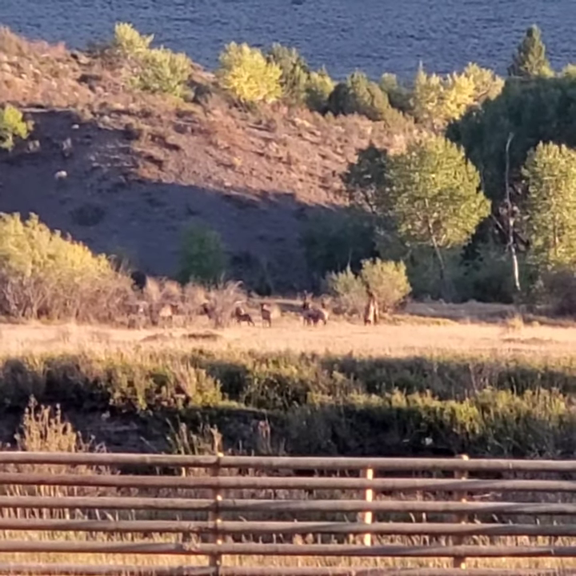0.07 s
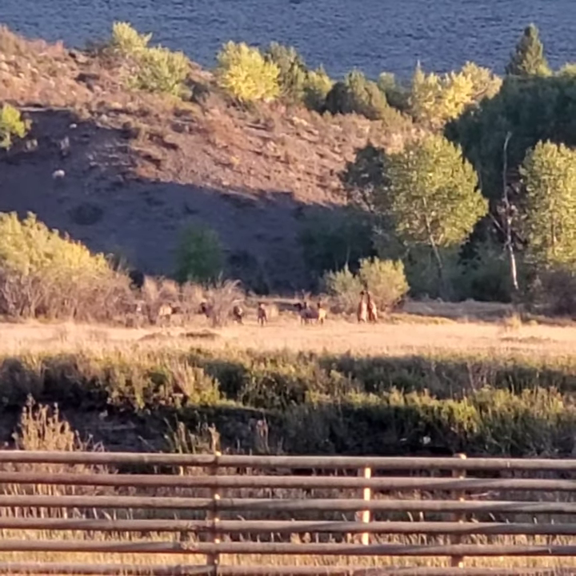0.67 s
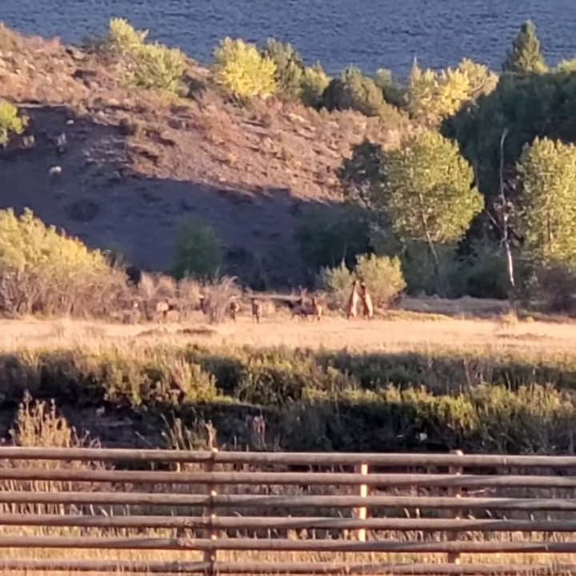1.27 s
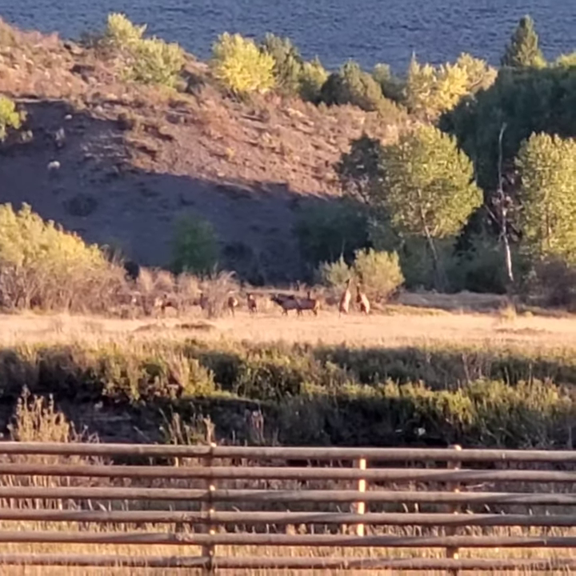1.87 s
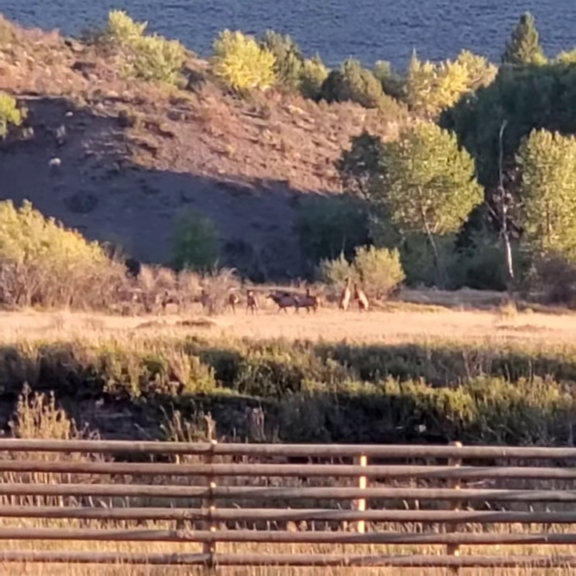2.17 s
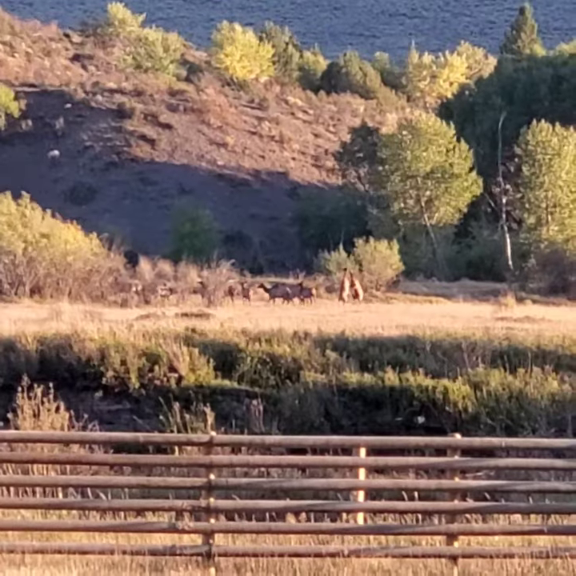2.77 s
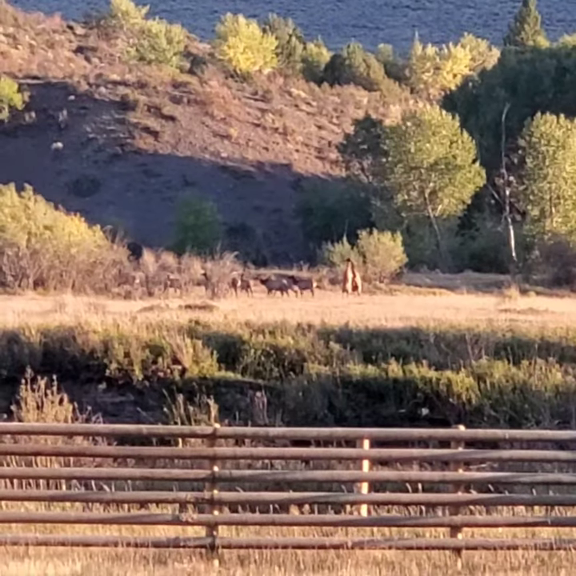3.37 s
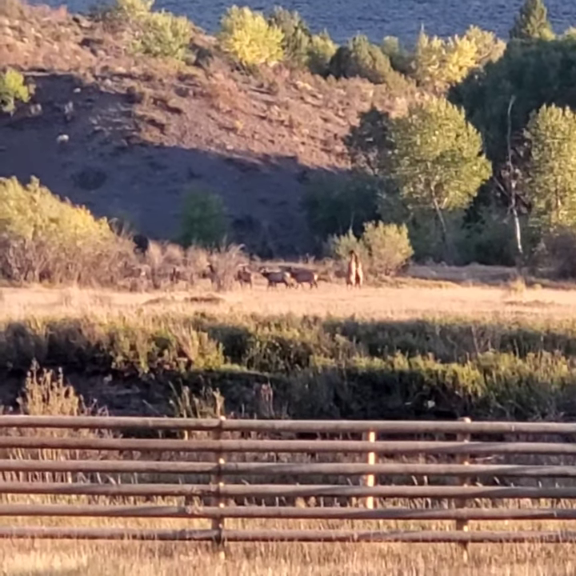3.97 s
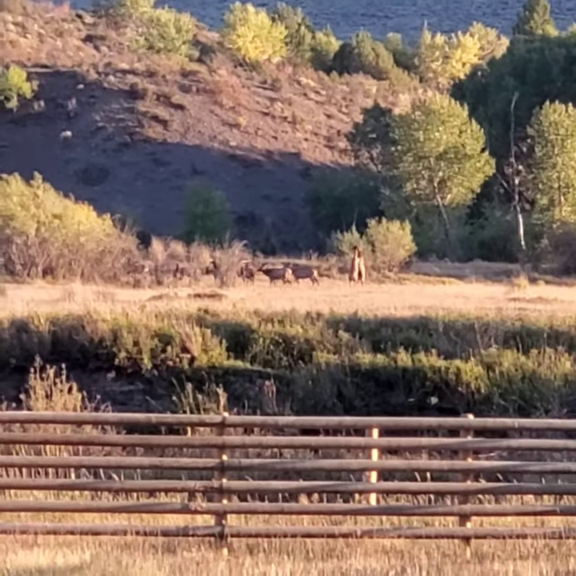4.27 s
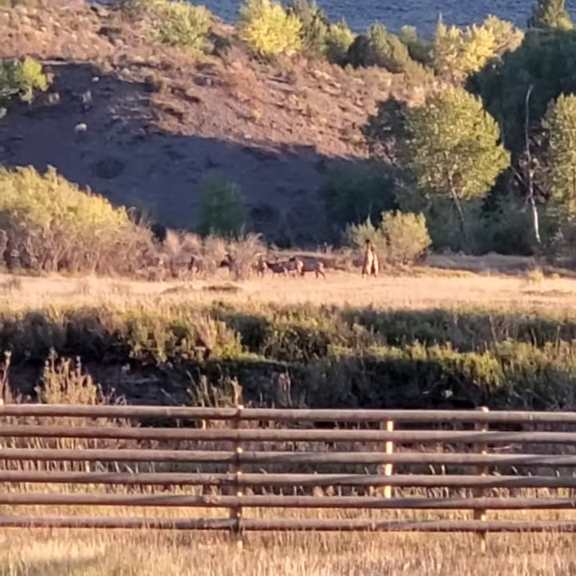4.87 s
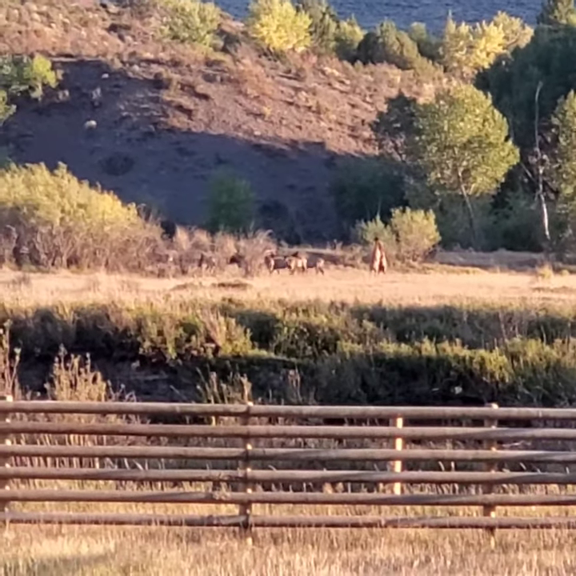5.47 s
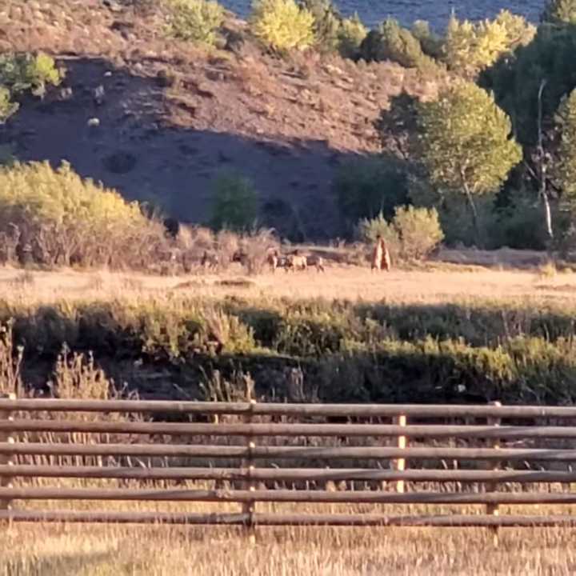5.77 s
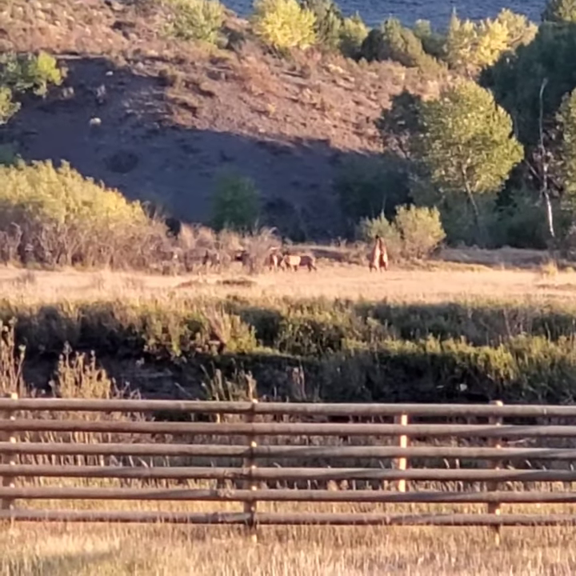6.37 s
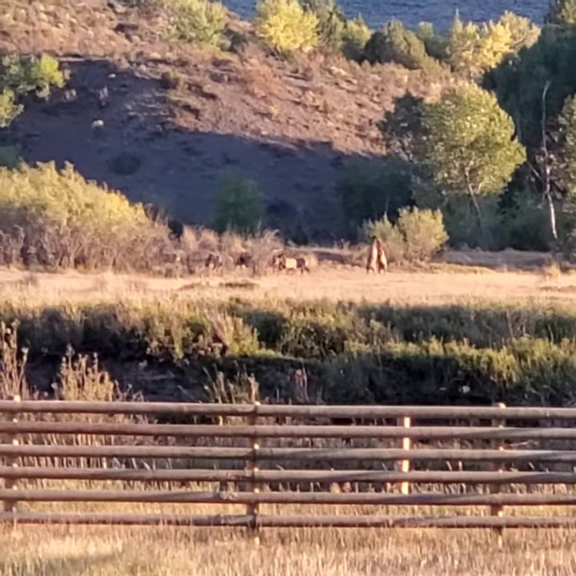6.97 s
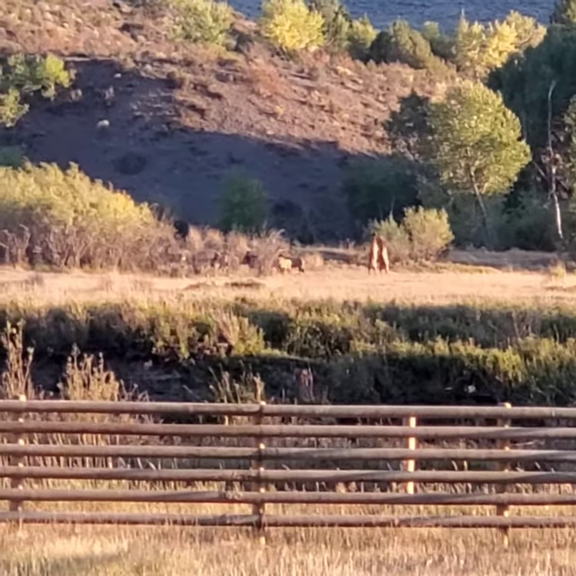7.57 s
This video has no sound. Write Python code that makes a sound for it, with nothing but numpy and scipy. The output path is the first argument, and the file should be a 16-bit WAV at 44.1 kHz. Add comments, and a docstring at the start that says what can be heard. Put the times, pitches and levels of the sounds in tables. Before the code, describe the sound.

Light wind rumbles and thumps on the microphone over a distant idling engine and a steady outdoor hiss.

```python
"""Breezy meadow with a distant engine

Hand-held two-port microphone in the open. Some way off to the right a big engine idles: exhaust drone,
with a chuff, soft clatter and faint squeaks on every cycle. Far traffic swells and fades over a steady
hiss; puffs of breeze stir the grass. Up close, wind rumbles and thumps and fingers tick on the case."""
import sys
import numpy as np
from scipy import signal
from scipy.fft import rfft, irfft, next_fast_len
from scipy.io import wavfile
from scipy.ndimage import uniform_filter1d

SR = 44100
rng = np.random.default_rng(int(sys.argv[2]) if len(sys.argv) > 2 else 0)


def wav_out(sig):
    """Save sig, one row per channel (or a flat mono array), as 16-bit PCM at SR to the path in sys.argv[1]."""
    wavfile.write(sys.argv[1], SR, np.round(np.clip(np.atleast_2d(sig).T, -1, 1) * 32767).astype(np.int16))


N = 336042
TIME = np.arange(N) / SR
SIZE = next_fast_len(N, True)
FREQ = np.maximum(np.fft.rfftfreq(SIZE, 1 / SR), 1)
CYCLE_HZ = 5.0  # engine cycles a second

# Exhaust drone. Each row: multiple of the engine cycle, level in dB.
EXHAUST_HARMONICS = [(8, -43), (9, -50), (10, -43), (11, -44), (12, -43), (13, -35), (14, -47), (15, -50),
                     (16, -46), (18, -48), (19, -40), (21, -48), (22, -49), (24, -53), (26, -60), (27, -60),
                     (29, -60)]
# Chuff of pipe and body. Each row: seconds into the cycle, pitch in Hz, width in Hz, level in dB.
ENGINE_KNOCKS = [(.115, 207, 29, -48.7), (.114, 260, 105, -60), (.122, 178, 80, -60.5),
                 (.139, 235, 80, -61.5), (.137, 359, 75, -58.5), (.004, 412, 46, -60),
                 (.050, 430, 90, -65.5), (.100, 430, 110, -64), (.121, 580, 220, -63),
                 (.140, 640, 260, -62.5), (.159, 800, 630, -66.5)]
# Valves. Each row: seconds into the cycle, half length in seconds, centre and width in Hz, level in dB.
VALVE_RATTLES = [(.164, .015, 1230, 300, -61.5), (.186, .013, 1420, 360, -63),
                 (.186, .022, 1850, 140, -65.5), (.178, .012, 2300, 900, -70.5),
                 (.029, .011, 2860, 1200, -71.5)]
# Ringing fan and covers. Each row: centre in Hz, width in Hz, level in dB.
COVER_RESONANCES = [(408, 16, -63), (741.3, 39, -61), (1137, 12, -72.5), (1198, 45, -65.5),
                    (1296, 19, -75.5), (1495, 25, -71.5), (1850, 22, -71.5), (2745, 42, -73)]
# Engine squeaks. Each row: seconds into the cycle, pitch in Hz, base level in dB.
ENGINE_SQUEAKS = [(.018, 6950, -88), (.040, 7830, -89), (.065, 7720, -85.5), (.122, 6920, -86),
                  (.148, 7600, -89), (.146, 8700, -91)]
# Colour of the hillside echo. Each row: frequency in Hz, gain in dB.
ECHO_COLOUR = [(150, -5), (500, 0.5), (1200, 5.5), (3000, 0)]
# Balance at the microphone. Each row: frequency in Hz, lead of the right port over the left in dB.
RIGHT_LEAD = [(200, 0.5), (400, 1.5), (750, 3.5), (1300, 5), (2500, 0.5), (7000, 3.5), (12000, 0.5)]
# Spectra of valley air, far road, grass and wind rumble. Each row: frequency in Hz, relative level in dB.
AIR_SPECTRUM = [(120, 3), (300, -3), (400, 0), (600, -2.5), (760, -4.5), (950, -11), (1250, -9.5),
                (2000, -17.5), (2700, -16.5), (3350, -15), (3900, -30.5), (5200, -37), (6300, -40.5),
                (7700, -42), (9800, -48), (11700, -42.5), (15000, -42)]
ROAD_SPECTRUM = [(250, -16), (460, -2.5), (680, -0.5), (900, -10), (1130, -8), (1550, -14.5), (2200, -24),
                 (4000, -38.5), (8000, -53)]
GRASS_SPECTRUM = [(800, -17), (1250, 3), (1550, 8), (2000, -10.5), (3200, -11.5), (4200, -23), (6500, -34),
                  (12000, -39.5)]
RUMBLE_SPECTRUM = [(12, -31), (24, -12), (40, -1.5), (62, -1.5), (85, -0.5), (115, -13), (160, -20),
                   (250, -35), (500, -54), (1500, -90)]
# Tyre whine from the far road. Each row: time in seconds, relative level in dB.
WHINE_LEVELS = [(0.0, -58), (1.2, -70.5), (1.7, -58.5), (2.8, -60), (3.4, -55.5), (3.84, -62),
                (5.04, -69.5), (5.42, -70.5), (5.63, -51), (5.88, -60.5), (6.25, -53), (6.55, -56),
                (6.85, -67), (7.15, -66), (7.36, -57.5), (7.6, -57.5)]
# Faster cars farther off. Each row: peak time and half length in seconds, level in dB, pitch in Hz.
FAST_CAR_PASSES = [(4.97, 0.26, -56.5, 890), (6.65, 0.14, -56, 876), (7.06, 0.16, -57, 860)]
# Puffs in the dry grass. Each row: peak time and half length in seconds, hiss and rustle levels in dB.
GRASS_PUFFS = [(.42, 0.16, -59.5, -77.5), (2.38, 0.045, -57, -83), (2.517, 0.13, -55, -76.5),
               (3.17, 0.1, -63, -80), (3.772, .06, -53, -90), (5.95, .22, -62, -90)]
# Breeze on the microphone. Each row: time in seconds, strength in dB, lean to the left port in dB.
BREEZE_COURSE = [(0.0, -31.5, 4), (.15, -33, -3.5), (.35, -26.5, 6), (.58, -31, 7), (.78, -30.5, -4.5),
                 (.98, -30.5, -1.5), (1.8, -31, 6), (2.7, -30, 1), (2.88, -29.5, 1), (3.05, -31, -14.5),
                 (3.45, -34.5, 1.5), (3.92, -35, 5.5), (4.05, -29.5, 14.5), (4.5, -29.5, 8.5),
                 (4.8, -30, -8), (5.15, -35, 7.5), (5.6, -30, 15.5), (5.94, -31.5, -5), (6.08, -31.5, 2),
                 (6.3, -31.5, 5), (6.48, -32, 9), (6.76, -30, 11), (7.15, -36, 0.5), (7.33, -30.5, 13.5),
                 (7.6, -36, 16.5)]
# Strong eddies. Each row: time in seconds, port (0 left, 1 right), strength in dB, frequency in Hz.
PORT_EDDIES = [(1.287, 0, -12.5, 62.2), (2.917, 1, -7.5, 70), (4.076, 0, -14.5, 98), (4.150, 0, -19, 138),
               (4.269, 0, -14.5, 62), (4.375, 0, -13.5, 86.5), (4.419, 0, -17.5, 95), (4.540, 0, -20, 84.6),
               (4.627, 1, -19.5, 105), (4.806, 1, -16.5, 75.5), (4.878, 1, -10, 72.5),
               (5.303, 0, -15.5, 94.6), (5.658, 0, -6, 87.6), (5.83, 0, -15.5, 104), (6.295, 0, -20, 107),
               (6.733, 0, -15, 70.7), (7.317, 0, -13, 77.7), (7.407, 0, -13.5, 65.7),
               (7.595, 0, -6.5, 74.2)]
# Brief bright rustles: a high one with a puff in the grass, then fingers rubbing the case.
# Each row: peak time and half length in seconds, level in dB, centre in Hz.
BRIGHT_RUSTLES = [(2.5, .1, -78, 12500), (4.56, .05, -71, 11500), (6.162, .04, -74, 6000),
                  (6.45, .05, -77, 13000)]
# Case ticks. Each row: start in seconds, mid-port peak in dB, centre and width in Hz, decay in seconds.
FINGER_TICKS = [(4.4985, -60, 10800, 3500, .001), (4.5145, -58.5, 5300, 2000, .002),
                (4.5203, -48.5, 11100, 2600, .0013), (4.555, -45, 9800, 6960, .0009),
                (4.555, -48.5, 5400, 1800, .001), (4.582, -52, 13500, 5500, .001),
                (4.648, -47, 3100, 700, .005), (4.651, -60, 4860, 500, .004),
                (6.1492, -52.5, 4950, 1900, .0008), (6.1628, -44, 6850, 2200, .001),
                (6.1626, -52.5, 4600, 1300, .001), (6.163, -51.5, 11900, 1800, .0014),
                (6.469, -59, 13500, 4000, .001)]


def undb(db):
    """Decibels to gain."""
    return 10 ** (np.asarray(db) / 20)


def unit(x):
    """Scale to rms 1."""
    return x / np.sqrt(np.mean(x ** 2))


def curves(table):
    """Each column of a table of timed rows, sample by sample."""
    times, *columns = np.transpose(table)
    return [np.interp(TIME, times, column) for column in columns]


def colour(points):
    """Gain at every frequency from (Hz, dB) points."""
    hz, db = np.transpose(points)
    return undb(np.interp(np.log(FREQ), np.log(hz), db))


def band(hz, width):
    """Response of a resonance applied twice."""
    return 1 / (1 + 1j * (FREQ / hz - hz / FREQ) * hz / width) ** 2


def shaped(x, response):
    """Filter x by a frequency response."""
    return irfft(rfft(x, SIZE) * response, SIZE)[..., :N]


def noise(response):
    """Fresh noise of rms 1 with the given colour."""
    return unit(shaped(rng.standard_normal(SIZE), response))


def walk(rate):
    """Random levels held 1 / rate seconds and smoothed twice; spread near 1."""
    hold = int(SR / rate)
    steps = np.repeat(rng.standard_normal(N // hold + 1), hold)
    return 1.12 * uniform_filter1d(uniform_filter1d(steps, hold), hold)[:N]


def swell(s, half_s):
    """A smooth rise and fall, 1 at time s."""
    return np.exp(-((TIME - s) / half_s) ** 2)


def cycle_gate(s, half_s):
    """A smooth rise and fall at the same place in every engine cycle."""
    away_s = (((TIME - s) * CYCLE_HZ + .5) % 1 - .5) / CYCLE_HZ
    return np.exp(-(away_s / half_s) ** 2)


def from_right(x, lag_s=.000275):
    """A source off to the right reaches the left port later and a little weaker."""
    shade = np.sqrt(colour(RIGHT_LEAD))
    delay = np.exp(-2j * np.pi * FREQ * lag_s)
    return np.array([shaped(x, delay / shade), shaped(x, shade)])


def all_around(response, direct, port_travel_s=.00031):
    """Noise from every side, alike at both ports only in the bass, plus a direct share from the right."""
    alike = np.sinc(2 * FREQ * port_travel_s)
    shade = np.sqrt(colour(RIGHT_LEAD))
    mid, side = (shaped(noise(response), np.sqrt((1 + sign * alike) / 2)) for sign in (1, -1))
    diffuse = np.array([shaped(mid + side, 1 / shade), shaped(mid - side, shade)])
    return np.sqrt(1 - direct) * diffuse + np.sqrt(direct) * from_right(noise(response))


def exhaust_drone(waver_db=1.5):
    """Low harmonics of the engine cycle, each wavering on its way through the moving air."""
    phase = 2 * np.pi * CYCLE_HZ * TIME
    out = 0
    for multiple, db in EXHAUST_HARMONICS:
        amplitude = np.sqrt(2) * undb(db + waver_db * walk(1.4))
        out += amplitude * np.sin(multiple * phase + rng.uniform(0, 2 * np.pi))
    return out


def engine_knocks(scatter_db=.56, jitter_s=.00067, rush_share=.5):
    """Once a cycle a blow rings each resonance of pipe and body; distance softens the attack."""
    starts = np.arange(0, N / SR, 1 / CYCLE_HZ)
    age = TIME[:SR // 4]
    out = 0
    for s, hz, width, db in ENGINE_KNOCKS:
        late, size = rng.standard_normal((len(starts), 2)).T
        blows = np.zeros(N + SR)
        blows[np.abs((starts + s + jitter_s * late) * SR).astype(int)] = undb(scatter_db * size)
        envelope = age ** 2 * np.exp(-np.pi * width * age)
        ring = signal.fftconvolve(blows, envelope * np.sin(2 * np.pi * hz * age))[:N]
        # the rush of gas makes every blow a little different
        rush = signal.fftconvolve(blows, envelope)[:N] * noise(band(hz, width) ** 2)
        out += undb(db) * unit(unit(ring) + rush_share * unit(rush))
    return out


def valve_clatter(scatter_db=1.9):
    """The valves give short, dull rattles at the same places in every cycle."""
    out = 0
    for s, half_s, hz, width, db in VALVE_RATTLES:
        gate = cycle_gate(s, half_s) * undb(scatter_db * walk(7.6))
        out += undb(db) * unit(gate * noise(band(hz, width) ** 2))
    return out


def cover_ringing():
    """The engine keeps its fan and covers ringing; they waver by a decibel in the moving air."""
    return sum(undb(db + walk(2.7)) * noise(band(hz, width)) for hz, width, db in COVER_RESONANCES)


def engine_squeaks(scatter_db=3.0, waver=.005, carry_db=3.5):
    """Tiny, unsteady high notes tick along with the cycle, each time at another strength."""
    out = 0
    for s, hz, db in ENGINE_SQUEAKS:
        pitch = hz * (1 + waver * walk(200))
        note = np.sqrt(2) * np.sin(2 * np.pi * np.cumsum(pitch) / SR)
        out += undb(db + scatter_db * walk(6)) * cycle_gate(s, half_s=.009) * note
    return out * undb(carry_db * swell(3.9, half_s=.6))  # for a moment they carry best


def hillside_echo(x, gain_db=-7, t60_s=.38):
    """The hillside throws the sound back as a blurred, fading tail, different at each port."""
    tails = rng.standard_normal((2, SR)) * undb(-60 * TIME[:SR] / t60_s)
    echo = np.array([signal.fftconvolve(x, tail / np.linalg.norm(tail))[:N] for tail in tails])
    return undb(gain_db) * shaped(echo, colour(ECHO_COLOUR))


def valley_air(level_db=-44, flicker_db=1.1):
    """Steady hiss all round the microphone; its middle range flickers a little in the breeze."""
    air = all_around(colour(AIR_SPECTRUM), direct=.13)
    middle = shaped(air, np.abs(band(800, 2600)))
    return undb(level_db) * (air + middle * (undb(flicker_db * walk(14)) - 1))


def tyre_whine(hz, width_hz=19):
    """Far tyres sing: a narrow band of noise around a moving pitch."""
    flutter = noise(1 / (1 + (FREQ / width_hz) ** 4))
    return unit(flutter * np.sin(2 * np.pi * np.cumsum(hz) / SR))


def far_traffic(road_db=-60, pass_db=-47, whine_hz=763, whine_lift_db=1.4, fade_db=2.2):
    """The far road's roar swells as one vehicle passes; tyre whines drift in pitch above it."""
    passing = undb(pass_db) * swell(3.14, half_s=.7)
    roar = all_around(colour(ROAD_SPECTRUM), direct=.24) * np.hypot(undb(road_db), passing)
    drift = 1 + .008 * walk(1.5)
    whine = undb(curves(WHINE_LEVELS)[0] + whine_lift_db) * tyre_whine(whine_hz * drift)
    for s, half_s, db, hz in FAST_CAR_PASSES:
        whine += undb(db) * swell(s, half_s) * tyre_whine(hz * drift)
    return roar + from_right(whine * undb(fade_db * walk(9)))  # tyres fade in and out in the moving air


def grass(lull_db=-74, grain_db=4.0, rustle_hz=5000, width_hz=1900):
    """Puffs of breeze cross the meadow as soft swells of hiss; dry stalks close by add a crisp rustle."""
    soft = undb(lull_db) + sum(undb(db) * swell(s, half_s) for s, half_s, db, _ in GRASS_PUFFS)
    crisp = sum(undb(db) * swell(s, half_s) for s, half_s, _, db in GRASS_PUFFS)
    crisp *= undb(grain_db * walk(150))
    stalks = np.array([noise(band(rustle_hz, width_hz)) for _ in range(2)])
    return soft * all_around(colour(GRASS_SPECTRUM), direct=.046) + crisp * stalks


def wind_rumble(flutter_db=4.4, rumble_db=-1.0, strong_db=-22, tear_db=-41, tear_slope=1.5):
    """The breeze veers from port to port of the microphone, with its own turbulence at each."""
    strength_db, lean_db = curves(BREEZE_COURSE)
    ports = []
    for side in 1, -1:
        push_db = strength_db + side * lean_db / 2 + flutter_db * walk(16)
        low = undb(push_db + rumble_db) * noise(colour(RUMBLE_SPECTRUM))
        # strong gusts tear into smaller, higher eddies
        high = undb(tear_db + tear_slope * (push_db - strong_db)) * noise(band(135, 130) ** 2)
        ports.append(low + high)
    return np.array(ports)


def eddy_thumps(half_cycles=.69, core_db=-13):
    """A swirl passes one port: pressure, then suction; its tight core steepens the drop."""
    out = np.zeros((2, N))
    for s, port, db, hz in PORT_EDDIES:
        for part_hz, part_db in (hz, db), (2 * hz, db + core_db):
            turns = (TIME - s) * part_hz
            envelope = 1 / np.cosh(np.clip(turns / half_cycles, -20, 20))
            out[port] -= undb(part_db) * envelope * np.sin(2 * np.pi * turns)
    return out


def bright_rustles(width_share=.9, left_db=-5):
    """Brief and louder on the right: a high rustle with a grass puff, then fingers rubbing the case."""
    out = 0
    for s, half_s, db, hz in BRIGHT_RUSTLES:
        hiss = np.array([undb(port_db) * noise(band(hz, width_share * hz)) for port_db in (left_db, 0)])
        out += undb(db) * swell(s, half_s) * hiss
    return out


def finger_ticks(attack_s=.00065, rub_db=-31, rub_s=.016, right_lead_db=8.5):
    """Tiny bright cracks of the case, nearer the right port, each trailed by a faint rub of skin."""
    out = np.zeros((2, N))
    for s, db, hz, width, decay_s in FINGER_TICKS:
        age = np.maximum(TIME - s, 0)
        rise = 1 - np.exp(-age / attack_s)
        fall = np.exp(-age / decay_s) + undb(rub_db) * np.exp(-age / rub_s)
        crack = shaped(rise * fall * rng.standard_normal((2, N)), band(hz, width))
        out += undb(db) * crack / np.abs(crack).max(axis=1, keepdims=True)
    return out * undb([[-right_lead_db / 2], [right_lead_db / 2]])


def scene():
    """Engine, valley and road from afar, grass all round; wind and fingers on the microphone itself."""
    rattle = engine_knocks() + valve_clatter() + cover_ringing()
    engine = from_right(exhaust_drone() + rattle + engine_squeaks()) + hillside_echo(rattle)
    landscape = valley_air() + far_traffic() + grass()
    close_by = wind_rumble() + eddy_thumps() + finger_ticks() + bright_rustles()
    return engine + landscape + close_by


def record(dry):
    """The sound fades in over its first few milliseconds; the recorder cuts the top treble."""
    open_s, top_hz = .004, 15750
    low_pass = signal.ellip(10, .1, 80, top_hz, fs=SR, output="sos")
    return signal.sosfilt(low_pass, dry * np.minimum(TIME / open_s, 1))


dry = scene()
out = record(dry)
wav_out(out)
```